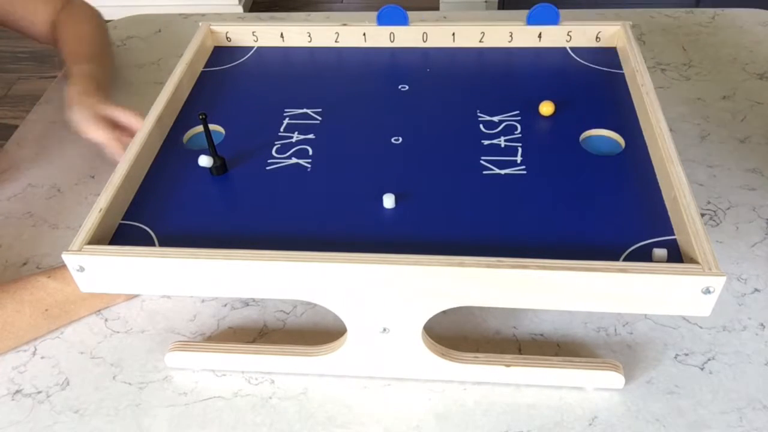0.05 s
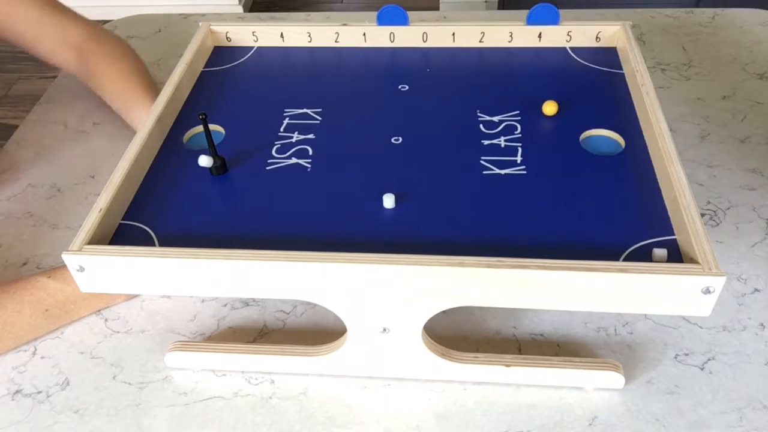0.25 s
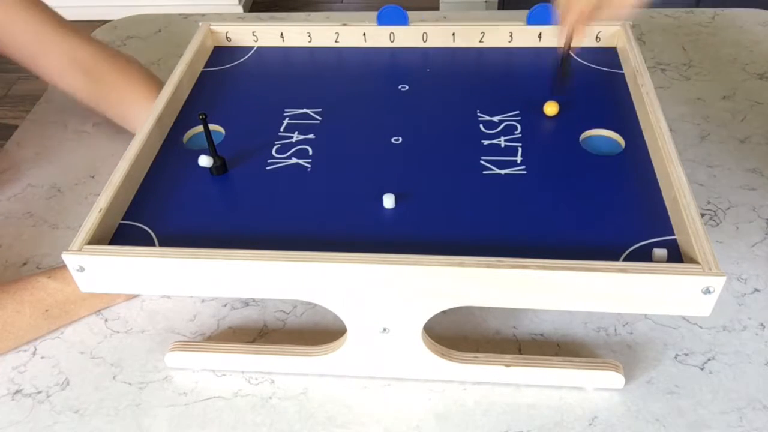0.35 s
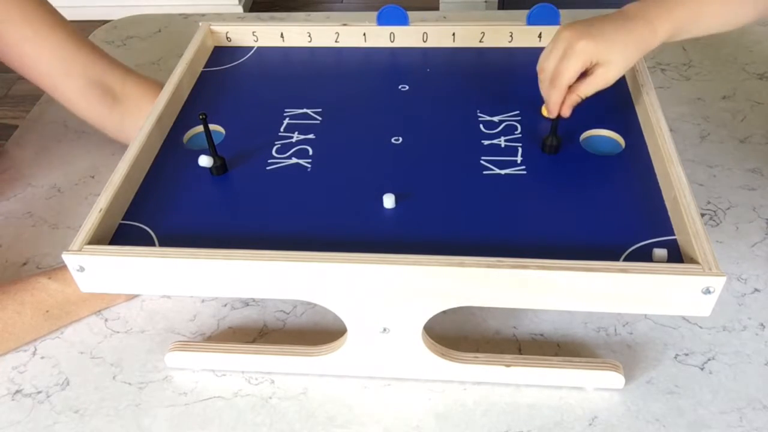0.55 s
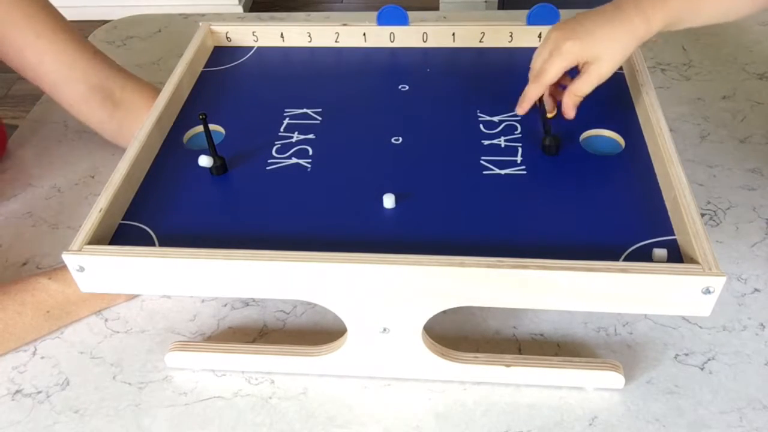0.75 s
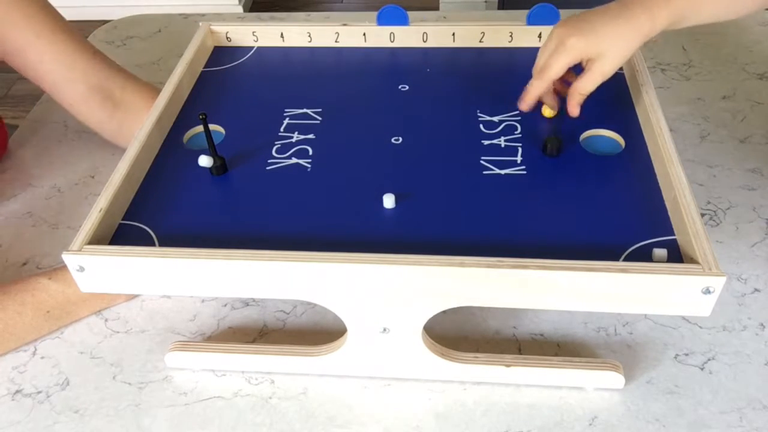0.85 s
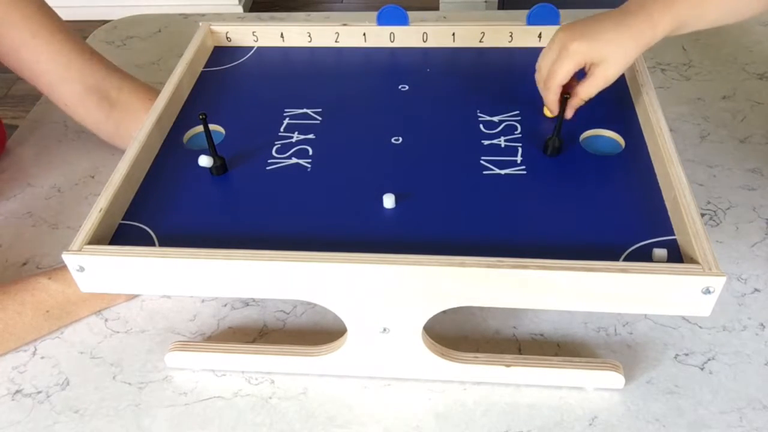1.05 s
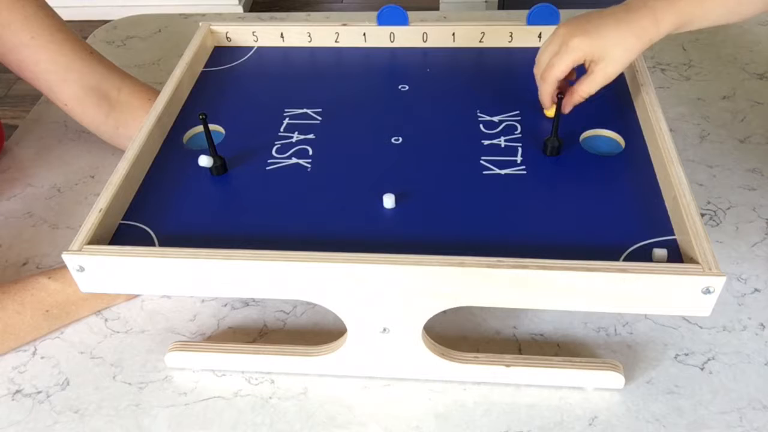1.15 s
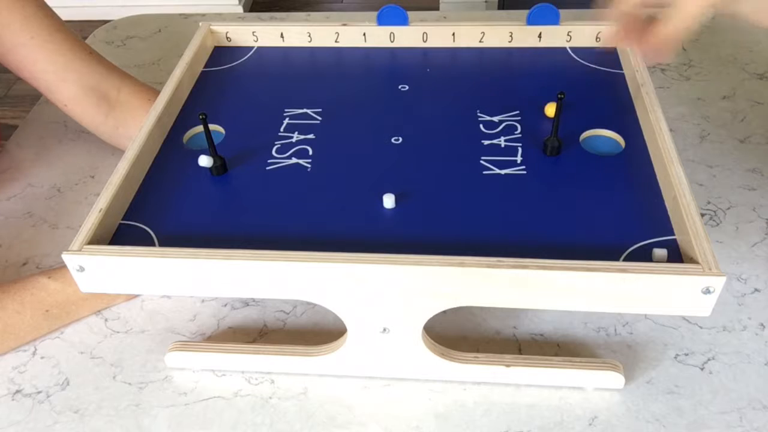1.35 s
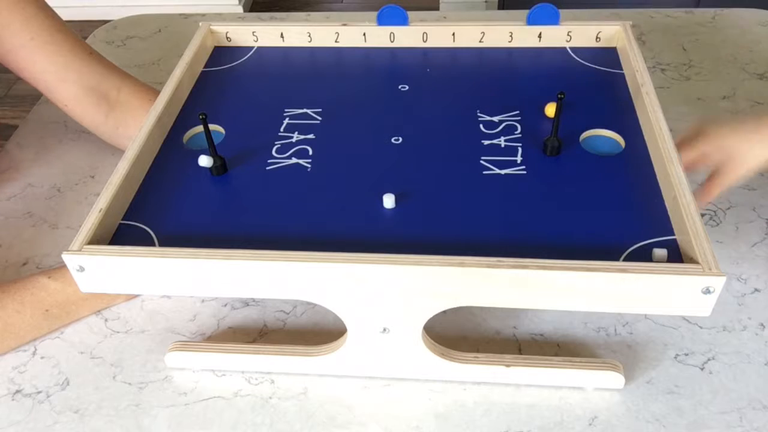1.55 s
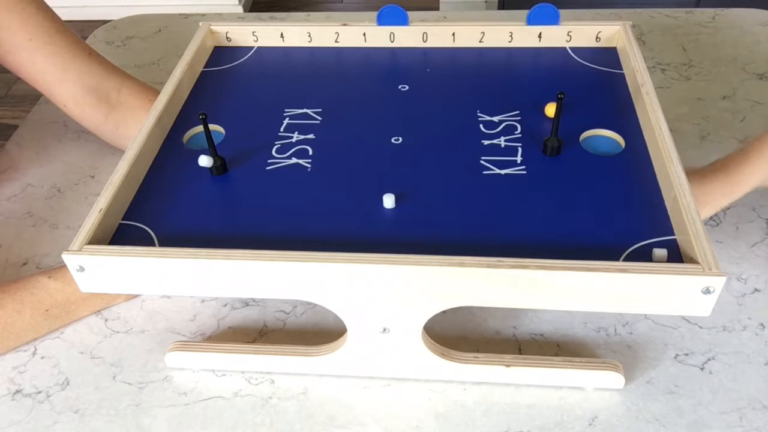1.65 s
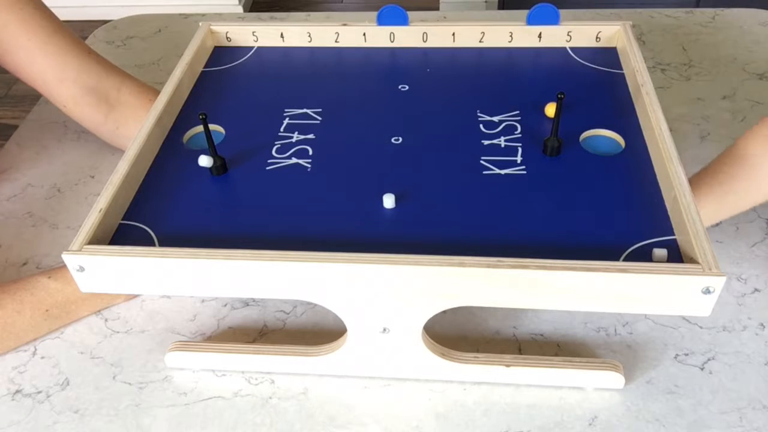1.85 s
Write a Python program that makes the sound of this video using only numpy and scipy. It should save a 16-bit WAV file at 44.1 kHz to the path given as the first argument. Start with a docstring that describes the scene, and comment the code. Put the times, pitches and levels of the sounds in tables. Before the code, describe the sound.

Plastic and magnet clacks on a wooden game board. Over faint low hum, a woody snap at 0.2 seconds, then a sharp, brighter double clack at 0.4. A flatter, fuller landing at 0.6 leaves a soft bright tail. Irregular clicks and knocks, gradually weaker, rock on until 1.35, ending in a tiny quickening rattle near 1.4 to 1.5. Small reverberant room, then near quiet.

```python
"""Over a faint hum, a magnet snaps onto the underside of a wooden game board; a plastic striker is set down
on top, clacks, rocks against its magnet and settles in a quickening rattle.
Each contact excites damped modes of board and striker (decaying sines) and a short burst of dense
vibration (coloured noise under envelopes). A small live room answers with a diffuse tail, and a
soft bright hiss, part of that tail, fades after the striker lands."""
import sys
import numpy as np
from scipy import signal
from scipy.fft import rfft, irfft, next_fast_len
from scipy.io import wavfile
from scipy.ndimage import map_coordinates

SR = 44100
rng = np.random.default_rng(int(sys.argv[2]) if len(sys.argv) > 2 else 0)


def file_out(sig):
    """Save sig as 16-bit WAV at sys.argv[1]."""
    # one column per channel
    cols = np.atleast_2d(sig).T
    # limit, then scale
    lim = np.clip(cols, -1, 1)
    pcm = np.round(lim * 32767).astype(np.int16)
    wavfile.write(sys.argv[1], SR, pcm)


N = 83790  # samples


def amp(db):
    """Level to linear gain: 20 dB is a factor of ten in amplitude."""
    return 10 ** (np.asarray(db) / 20)


def along(points, hz):
    """Interpolation of (Hz, value) points on a logarithmic frequency axis."""
    f, v = np.transpose(points)
    return np.interp(np.log(hz + 1), np.log(f + 1), v)


def noise(spectrum, size):
    """Spectral shaping: white noise weighted in frequency, then scaled to rms 1."""
    white = rfft(rng.standard_normal(size))
    gain = amp(along(spectrum, np.fft.rfftfreq(size, 1 / SR)))
    coloured = irfft(white * gain, size)
    return coloured / coloured.std()


def add(track, s, sound):
    """Superposition: a sound sums into the track from time s in seconds."""
    part = track[round(s * SR):][:len(sound)]
    part += sound[:len(part)]


def envelope(t, attack, t60, hold=0):
    """Exponential decay: a quick rise, a short hold, then a fall of 60 dB per t60."""
    rise = 1 - np.exp(-t / attack)
    return rise * amp(-60 * np.maximum(t - hold, 0) / t60)


# Background air noise. Each row: frequency in Hz, relative density in dB per Hz.
AIR_SPECTRUM = [(20, -46.5), (32, -29), (42, 0.5), (52, -1.5), (70, -7), (95, -13), (150, -8), (240, -10),
                (400, -19), (700, -22.5), (1200, -23), (2760, -28.5), (6000, -38.5), (10000, -51),
                (16000, -53.5)]
# Partials of the appliance hum. Each row: frequency in Hz, level in dB rms.
HUM_PARTIALS = [(48.4, -61.5), (143, -64.5), (242, -74.5), (602, -77), (899, -73)]
AIR_DB = -57  # rms


def room_tone():
    """Stationary background: soft air noise and an appliance's hum, its partials wandering in phase."""
    t = np.arange(N) / SR
    hum = np.zeros(N)
    for hz, db in HUM_PARTIALS:
        # 8.7 random points per second, smoothly joined
        wander = map_coordinates(rng.standard_normal(64), [t * 8.7], mode="mirror")
        hum += amp(db) * np.sqrt(2) * np.sin(2 * np.pi * hz * t + 0.5 * wander)
    return amp(AIR_DB) * noise(AIR_SPECTRUM, N) + hum


def ring(modes, t, attack, scatter_db, detune):
    """Modal superposition: damped sines of alternating sign, varied in level and pitch by every blow."""
    total = np.zeros(len(t))
    for k, (hz, db, t60) in enumerate(modes):
        level_chance, pitch_chance = rng.standard_normal(2)
        gain = (-1) ** k * amp(db + scatter_db * level_chance)
        sine = np.sin(2 * np.pi * hz * (1 + detune * pitch_chance) * t)
        total += gain * envelope(t, attack, t60) * sine
    return total


# Modes of the board, of the striker, and of the board under a flat blow.
# Each row: frequency in Hz, level in dB relative to the contact, t60 in seconds.
BOARD_MODES = [(182, -14, 0.063), (329, -18, 0.1), (634, -20.5, 0.08), (756.4, -15, 0.11),
               (949.2, -9, 0.13), (1243, -8.5, 0.075), (1410, -16, 0.064), (1510, -8, 0.1),
               (1587, -20.5, 0.023), (1702, -6.5, 0.059), (1845, -10, 0.088), (1912, -7, 0.062),
               (2115, -11, .05), (2249, -10.5, 0.094), (2522, -10.5, 0.073), (2639, -7.5, 0.074),
               (2825, -12.5, 0.018), (3317, -4.5, 0.061)]
STRIKER_MODES = [(3550, -27, .022), (5082, -11, 0.031), (5250, 3, .028), (6980, -24, .02)]
FLAT_BLOW_MODES = [(359, -8.5, 0.074), (425, -5, .03), (512, -0.5, .035), (596, -8, .028), (840, -7, 0.01),
                   (1100, -8.5, 0.04)]
# The striker's base landing flat on the board. Each row: start in seconds, level in dB.
FLAT_LANDINGS = [(.5917, -20.5), (0.997, -33.5)]
BOARD_MODES_DB = -3.5  # the board's clear modes, relative to a contact's board level
BOARD_ATTACK_S, RING_ATTACK_S = 0.00076, 0.00066  # time constants


def ringing(contacts):
    """Impact excitation: each contact rings board and striker; flat landings drive the board's low modes."""
    out, t = np.zeros(N), np.arange(SR // 8) / SR
    for s, board_db, ring_db, _, _ in contacts:
        board = ring(BOARD_MODES, t, BOARD_ATTACK_S, scatter_db=0.7, detune=0.0018)
        add(out, s, amp(board_db + BOARD_MODES_DB) * board)
        striker = ring(STRIKER_MODES, t, RING_ATTACK_S, scatter_db=0, detune=0.004)
        add(out, s, amp(ring_db) * striker)
    for s, db in FLAT_LANDINGS:
        add(out, s, amp(db) * ring(FLAT_BLOW_MODES, t, attack=0.0008, scatter_db=2, detune=0.003))
    return out


def bursts(times, levels_db, attack, t60, hold):
    """Incoherent addition: overlapping bursts, one per contact, sum in power."""
    power, t = np.zeros(N), np.arange(SR // 8) / SR
    shape = envelope(t, attack, t60, hold)
    for s, db in zip(times, levels_db):
        add(power, s, (amp(db) * shape) ** 2)
    return np.sqrt(power)


# Dense short-lived vibration of wood, plastic and hard edges.
# Each row: frequency in Hz, relative density in dB per Hz.
WOOD_SPECTRUM = [(80, -45.5), (135, -19), (190, -3.5), (400, -7.5), (600, -6.5), (850, -10.5), (1300, 1),
                 (2200, -3.5), (3200, -5.5), (3900, -10), (4700, -25.5), (5300, -12.5), (6300, -10),
                 (7600, -27), (9000, -20.5), (10200, -31), (16000, -46.5)]
PLASTIC_SPECTRUM = [(300, -22.5), (2000, -5.5), (3400, 0.5), (4600, 2), (5600, -0.5), (6500, -3.5),
                    (7400, -1), (8100, -12), (10000, -26), (16000, -38.5)]
EDGE_SPECTRUM = [(2000, -22), (6000, -6.5), (8000, -5), (9000, 2.5), (10200, -7.5), (11400, 2),
                 (12700, -0.5), (13700, -2), (14700, -1), (15600, -5.5), (16500, -18.5)]
WOOD_DB = -2.5  # relative to a contact's board level
WOOD_T60_S, CLICK_T60_S, EDGE_T60_S = 0.032, 0.014, 0.012
CLICK_ATTACK_S = 0.00084  # time constant
HOLD_S = 0.0015  # vibration crosses the board before it starts to fade


def cracks(contacts, count):
    """High modal density: modes too crowded to tell apart act as noise, differing in each of count directions."""
    times, board_db, _, click_db, edge_db = np.transpose(contacts)
    wood = bursts(times, board_db + WOOD_DB, BOARD_ATTACK_S, WOOD_T60_S, HOLD_S)
    plastic = bursts(times, click_db, CLICK_ATTACK_S, CLICK_T60_S, hold=0.0012)
    edge = bursts(times, edge_db, CLICK_ATTACK_S, EDGE_T60_S, hold=0)
    layers = [(WOOD_SPECTRUM, wood), (PLASTIC_SPECTRUM, plastic), (EDGE_SPECTRUM, edge)]
    return [sum(strength * noise(spectrum, N) for spectrum, strength in layers) for _ in range(count)]


# Decay of the room. Each row: frequency in Hz, t60 in seconds.
ROOM_DECAY = [(150, 0.33), (500, 0.67), (1500, 0.59), (5000, .52), (9000, 0.41), (15000, 0.27)]
# Strength of the room. Each row: frequency in Hz, level in dB relative to the direct sound.
ROOM_LEVEL = [(150, -3), (350, 0.5), (1500, -2.5), (3500, -6.5), (5300, -9.5), (7000, -7.5), (15000, -6)]
ROOM_BUILD_S = 0.0098  # time constant of the build-up


def room(x):
    """Diffuse reverberation: convolution with noise whose decay time depends on frequency."""
    hz, t, cells = signal.stft(rng.standard_normal(SR * 3 // 4), SR, nperseg=256)
    t60 = along(ROOM_DECAY, hz)[:, None]
    unit_energy = np.sqrt(2 * np.log(1000) / (t60 * SR))  # evens out the energy of long and short decays
    gain = amp(along(ROOM_LEVEL, hz))[:, None] * unit_energy
    tail = signal.istft(cells * gain * envelope(t, ROOM_BUILD_S, t60), SR, nperseg=256)[1]
    return signal.fftconvolve(x, tail)[:N]


# A bright part of the room's tail. Each row: frequency in Hz, relative density in dB per Hz.
BRIGHT_TAIL_SPECTRUM = [(600, -26.5), (1200, -11), (3000, -8.5), (4500, 0.5), (8500, 4), (10500, -15.5),
                        (16000, -23)]
BRIGHT_TAIL_S, BRIGHT_TAIL_DB, BRIGHT_TAIL_T60_S = 0.612, -40, 0.45


def bright_tail():
    """Reverberant decay: a soft bright hiss, part of the room's tail, fades exponentially after the landing."""
    out, t = np.zeros(N), np.arange(SR // 2) / SR
    hiss = noise(BRIGHT_TAIL_SPECTRUM, len(t)) * envelope(t, attack=0.0049, t60=BRIGHT_TAIL_T60_S)
    add(out, BRIGHT_TAIL_S, amp(BRIGHT_TAIL_DB) * hiss)
    return out


# The last rocking: start and first gap in seconds, each gap over the one before.
SETTLE_S, SETTLE_GAP_S, SETTLE_SHRINK = 1.374, 0.0155, 0.88
# First levels in dB (board, striker ring, plastic click, hard-edge treble) and loss in dB per contact.
SETTLE_DB, SETTLE_LOSS_DB = (-39.5, -41, -58, -54), 1.5


def settling(count=11):
    """Energy loss in rocking: contacts come ever weaker and, on the whole, faster until the striker rests."""
    unevenness = np.exp(0.13 * rng.standard_normal(count))
    gaps = SETTLE_GAP_S * SETTLE_SHRINK ** np.arange(count) * unevenness
    times = SETTLE_S + np.cumsum(gaps) - gaps
    return [(s, *(np.array(SETTLE_DB) - SETTLE_LOSS_DB * k)) for k, s in enumerate(times)]


# Contacts of the pieces. Each row: start in seconds, board level in dB, striker ring level in dB,
# plastic click level in dB, hard-edge treble level in dB.
CLACKS = [(0.2102, -14.5, -28, -33, -28.5), (0.4088, -29, -28, -24, -41), (.4135, -18.5, -18, -26, -17.5),
          (0.4167, -21.5, -14.5, -31, -30), (0.5916, -21, -35, -22.5, -39.5),
          (0.6025, -26.5, -35, -17.5, -20.5), (0.6047, -24.5, -12, -17.5, -18.5),
          (0.68, -27.5, -46, -48, -55), (0.7627, -27, -16.5, -20, -27), (.769, -26.5, -44, -47, -30.5),
          (0.8201, -34.5, -30, -34, -52), (0.87, -36, -43, -38, -47), (0.8833, -26.5, -28.5, -26.5, -22),
          (0.8863, -27, -28, -32, -44), (.9568, -28.5, -35.5, -56, -38.5),
          (0.988, -27.5, -21.5, -21, -33.5), (1.006, -31, -35, -50, -35), (1.0547, -36, -31, -28, -40),
          (1.07, -27.5, -43, -36, -33), (1.088, -38, -41, -36, -49), (1.1291, -31.5, -38, -41, -42),
          (1.1416, -31.5, -34, -29.5, -41.5), (1.1617, -33.5, -40, -53, -45),
          (1.2029, -29, -19.5, -22.5, -28.5), (1.2628, -32, -29, -29, -33.5), (1.2946, -42, -41, -56, -43),
          (1.302, -34, -39, -58, -57), (1.330, -35.5, -43, -52, -44.5), (1.3543, -37.5, -39, -62, -48)]
RING_TO_ROOM_DB = -2.5  # the clear modes reach the room more weakly than the dense vibration


def scene():
    """Direct and reverberant fields: one direction arrives straight, the others return from the room."""
    contacts = list(CLACKS) + settling()
    modes = ringing(contacts)
    direct, *others = cracks(contacts, count=4)
    returns = [room(x + amp(RING_TO_ROOM_DB) * modes) for x in others]
    echo = sum(returns) / np.sqrt(len(others))
    return (room_tone() + modes + direct + echo + bright_tail())[None]


TOP_HZ = 16200


def record(dry):
    """Band limitation: a very steep low-pass removes what lies above the recorder's top frequency."""
    size = next_fast_len(N + SR // 2)
    hz = np.fft.rfftfreq(size, 1 / SR)
    low_pass = 1 / np.sqrt(1 + (hz / TOP_HZ) ** 160)
    return irfft(rfft(dry, size) * low_pass, size)[:, :N]


dry = scene()
out = record(dry)
file_out(out)
```